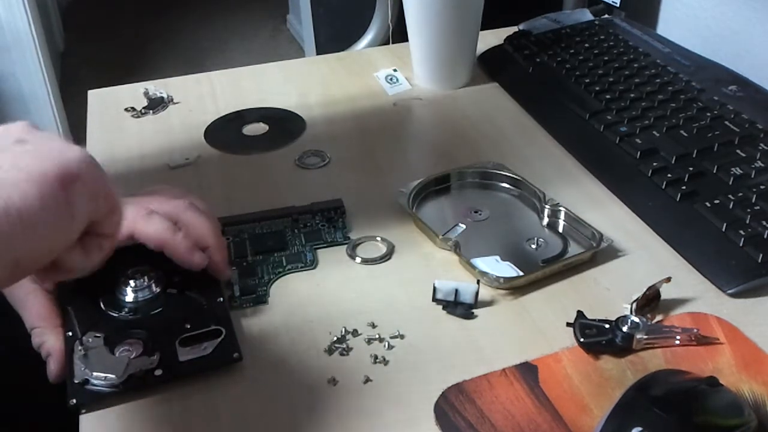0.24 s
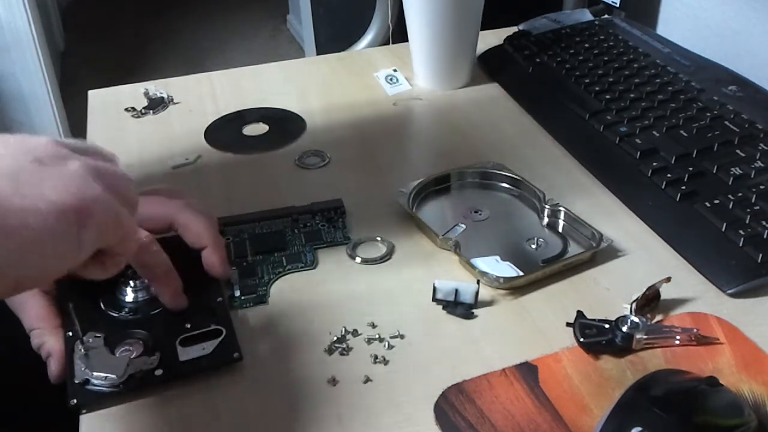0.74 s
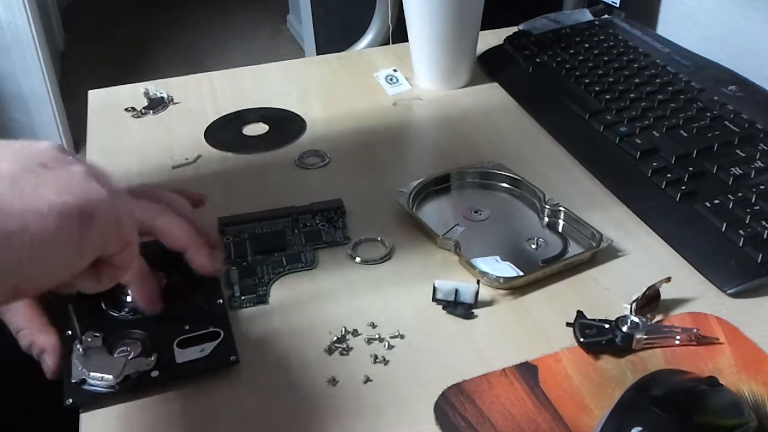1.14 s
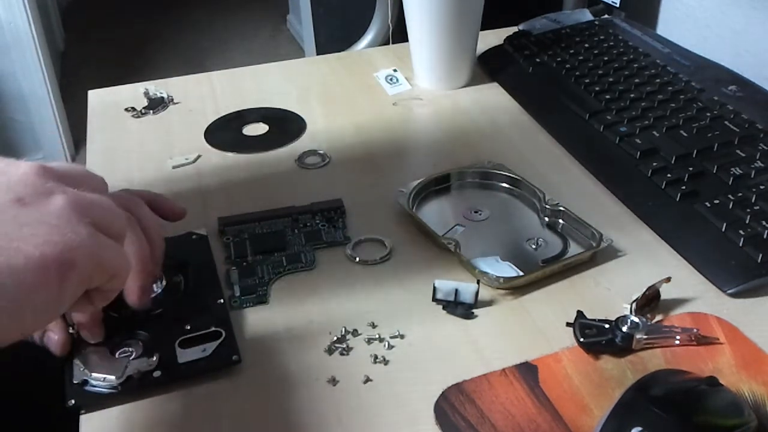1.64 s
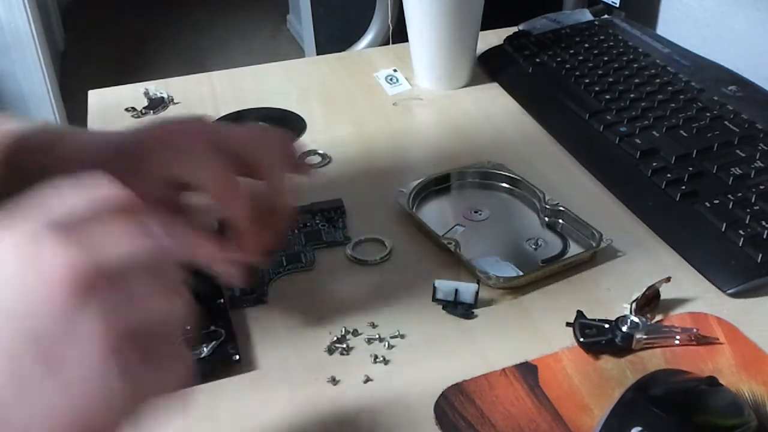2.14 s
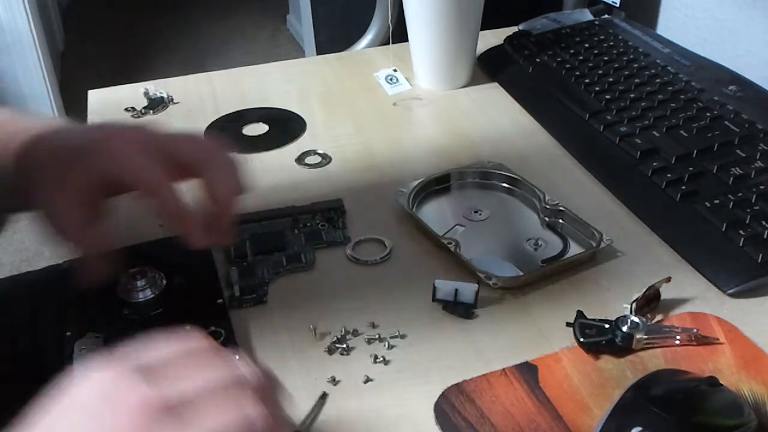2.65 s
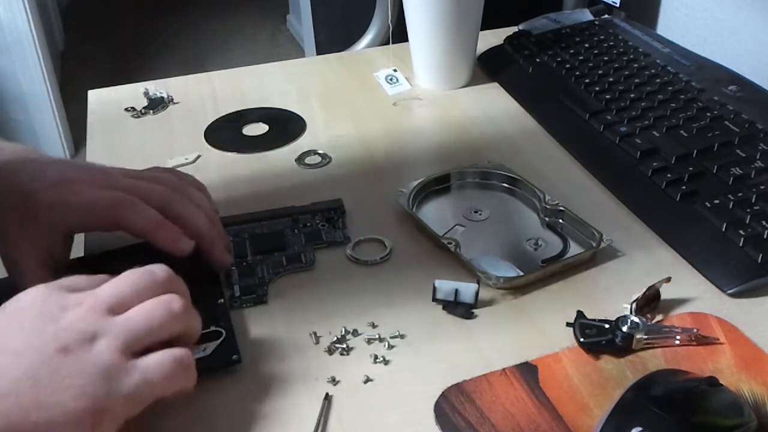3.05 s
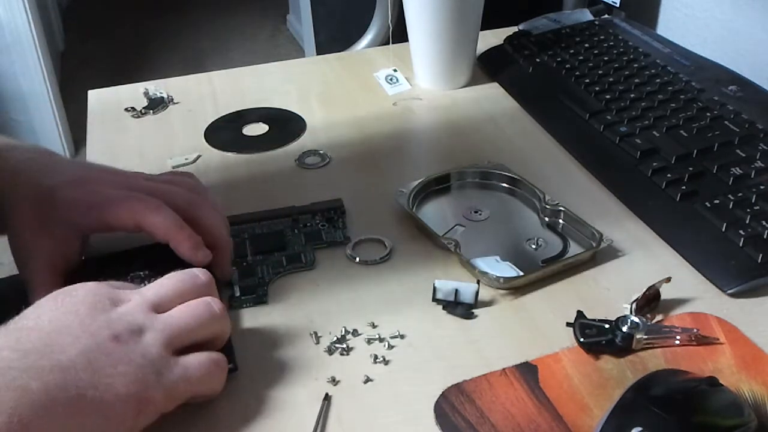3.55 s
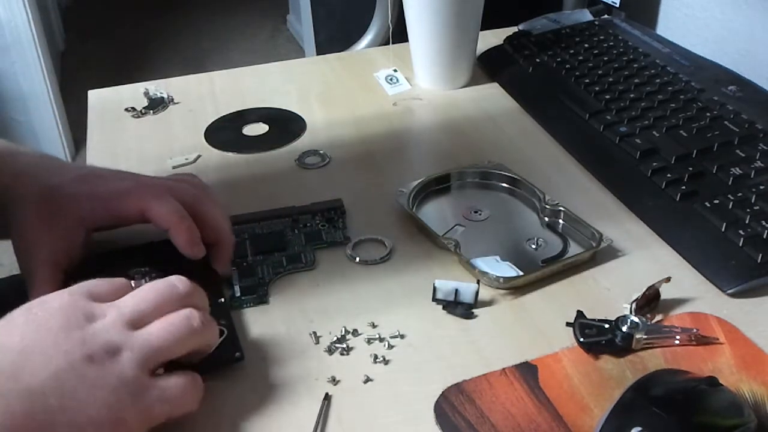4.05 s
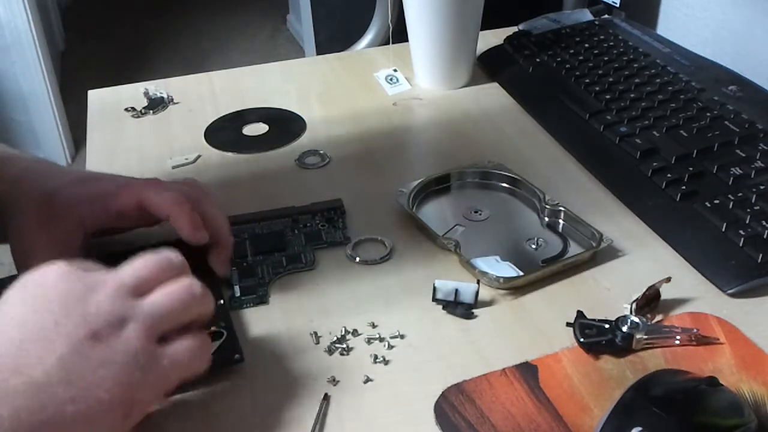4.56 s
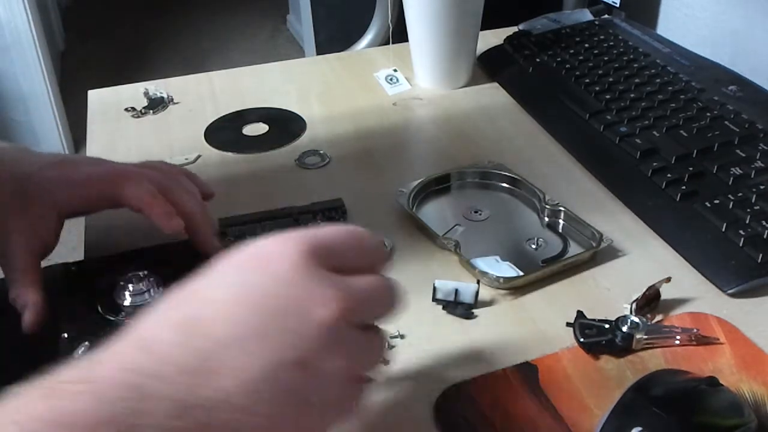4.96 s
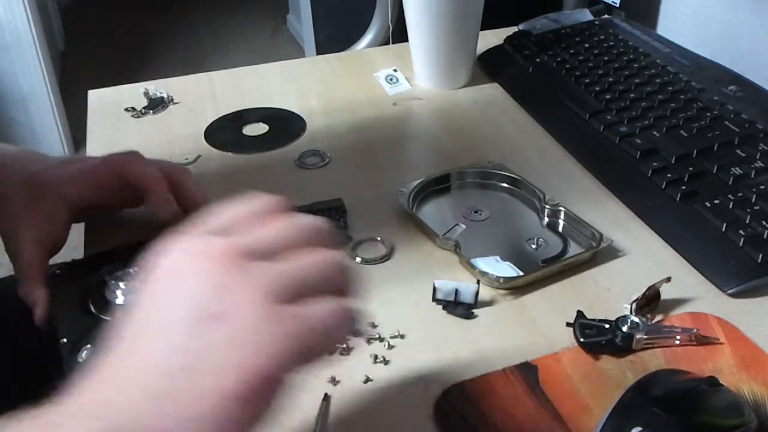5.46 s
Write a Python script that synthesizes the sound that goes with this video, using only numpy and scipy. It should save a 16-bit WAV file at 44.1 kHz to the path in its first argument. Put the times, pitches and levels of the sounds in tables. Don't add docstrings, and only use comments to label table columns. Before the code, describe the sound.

Hands dismantle a hard drive on a wooden desk in a small room, with a low fan hum and light hiss beneath. From 0 to 2.2 s a screwdriver rubs in a screw: short, swelling, gritty metallic scrapes, the strongest near 0.9 s, with tiny slip clicks from 1.1 s. At 2.46 s a hard tick, then a sharp crack at 2.54 s as a screw falls; until 2.9 s it skips while the tool bounces. Soft thuds follow at 3.1 and 3.4 s. From 3.7 to 3.9 s the metal frame crashes, bright, ringing and clipped. Ticks and rattles come around 4.2, 4.3 and 4.5 s, densest at 4.7 s. A small part is set down at 4.84 s, rocking briefly, then slides with a faint high squeak from 4.93 to 5.58 s. A hollow knock at 5.56 s and light clicks finish. Close, bright microphone; short room echo.

```python
import sys
import numpy as np
from scipy import signal
from scipy.fft import rfft, irfft
from scipy.io import wavfile

SR = 44100
rng = np.random.default_rng(int(sys.argv[2]) if len(sys.argv) > 2 else 0)


def file_out(sig):
    cols = np.atleast_2d(sig).T
    lim = np.clip(cols, -1, 1)
    pcm = np.round(lim * 32767).astype(np.int16)
    wavfile.write(sys.argv[1], SR, pcm)


def undo_db(level):
    steps = np.asarray(level, float) / 20
    return 10 ** steps


N = 252252


def rms_one(x):
    return x / np.sqrt(np.mean(x ** 2) + 1e-20)


def in_time(rows, outside=-120):
    s, *columns = np.transpose(rows)
    return [np.interp(np.arange(N) / SR, s, c, left=outside, right=outside) for c in columns]


def at_hz(points, hz, column=1):
    points = np.array(points)
    return np.interp(np.log(hz), np.log(points[:, 0]), points[:, column])


def high_pass(x, hz):
    return signal.sosfilt(signal.butter(4, hz, "high", fs=SR, output="sos"), x)


def add(out, s, piece):
    at = round(s * SR)
    out[at:at + len(piece)] += piece[:N - at]


def ring(drive, hz, t60_s):
    r = undo_db(-60 / (max(t60_s, 0.003) * SR))
    w = 2 * np.pi * hz / SR
    return signal.lfilter([0, np.sin(w)], [1, -2 * r * np.cos(w), r * r], drive + 1e-18)


def resonances(drive, peaks):
    out = 0
    for hz, width_hz, db in peaks:
        t60_s = np.log(1000) / np.pi / width_hz
        out = out + undo_db(db) * rms_one(ring(drive, hz, t60_s))
    return out


def grit(per_s, spread_db):
    sizes = undo_db(spread_db * np.minimum(rng.exponential(1, N), 4)) * rng.choice([-1, 1], N)
    return sizes * (rng.random(N) < per_s / SR)


def contact(length_ms, draw, first_db):
    t = np.arange(len(draw)) / SR
    burst = draw * np.abs(draw) * np.exp(-1000 * t / max(length_ms, 0.1))
    burst[0] = 4 * undo_db(first_db)
    return burst / np.sqrt(np.sum(burst ** 2))


def strike(touch, hz, t60_s):
    turning = np.exp(-2j * np.pi * hz * np.arange(1500) / SR)
    uptake = np.abs(np.sum(touch[:1500] * turning))
    return ring(touch, hz, t60_s) / np.sqrt(0.1 + 0.9 * uptake ** 2)


def swell(count, hz, t60_s, rise_ms, phase):
    t = np.arange(count) / SR
    rise = 1 - np.exp(-1000 * t / max(rise_ms, 0.1))
    return np.sin(2 * np.pi * hz * t + phase) * undo_db(-60 * t / t60_s) * rise


def cracks(rows):
    out = np.zeros(N)
    for s, db, hz, octaves, chatter_ms, first_db in rows:
        half = 2 ** (np.clip(octaves, 0.2, 3) / 2)
        edges_hz = [hz / half, min(hz * half, 0.45 * SR)]
        band = signal.butter(1, edges_hz, "band", fs=SR, output="sos")
        crack = signal.sosfilt(band, contact(chatter_ms, rng.standard_normal(4000), first_db))
        add(out, s, undo_db(db) * crack / np.abs(crack).max())
    return high_pass(out, 600)


def lone_rings(rows):
    out = np.zeros(N)
    for s, db, hz, t60_s in rows:
        rise_ms = min(1700 / hz, 5)
        add(out, s, undo_db(db) * swell(SR // 4, hz, max(t60_s, 0.01), rise_ms, 0))
    return out


# frequency in Hz, density in dB per Hz.
HISS = [(30, -60), (45, -40), (58, -20), (85, -39.5), (125, 0.5), (165, -17.5), (210, -2), (300, -3),
        (500, -2.5), (800, -7.5), (1200, -9.5), (2000, -12.5), (3000, -15.5), (4500, -19), (8500, -19.5)]
# frequency in Hz, width in Hz, rms in dB.
FAN_BANDS = [(202.5, 6.2, -61), (264, 5.2, -69.5), (477, 20, -64.5), (527, 3.8, -68), (615, 4.2, -67.5),
             (817, 10, -63), (1077, 33, -63.5)]


def room_noise():
    hz = np.maximum(np.fft.rfftfreq(N, 1 / SR), 1)
    hiss = rms_one(irfft(rfft(rng.standard_normal(N)) * undo_db(at_hz(HISS, hz)), N))
    return undo_db(-51.5) * hiss + resonances(rng.standard_normal(N), FAN_BANDS)


# greatest pressure in seconds, rub in dB, rise in s, fall in s.
TURNS_OF_TOOL = [
    (.17, -45.5, 0.066, 0.054),
    (.51, -50, 0.092, 0.11),
    (0.862, -44, 0.097, 0.037),
    (1.1, -49.5, .045, 0.12),
    (1.41, -64, 0.2, .1),
    (1.528, -50, 0.029, .03),
    (1.6, -60, .03, .05),
    (1.96, -56.5, 0.062, 0.18),
    (2.13, -53.5, 0.043, 0.08),
]


def pressure():
    t = np.arange(N) / SR
    turns, swing_db, grip_end_s = 0, 26.5, 1.9
    for s, db, rise_s, fall_s in TURNS_OF_TOOL:
        away = np.maximum((s - t) / rise_s, (t - s) / fall_s)
        turns = turns + undo_db(db - swing_db * away)
    return turns, t < grip_end_s


# frequency in Hz, width in Hz, level in dB.
RUB_RESONANCES = [(1110, 17, 1.5), (1303, 36, -1), (1832, 126, 2), (2880, 122, 1.5), (3827, 95, -1),
                  (4460, 260, 2.5), (5000, 330, -1.5), (5980, 380, -5.5), (7370, 1200, -3.5)]


def rubbing():
    split_hz, low_share_db, grip_db, grip_low_db = 3300, -2.5, -98, -75
    turns, held = pressure()
    drive = grit(4900, spread_db=6.5)
    upper = resonances(drive, [p for p in RUB_RESONANCES if p[0] > split_hz])
    upper = upper + 0.86 * rms_one(np.diff(drive, prepend=0))
    lower = resonances(drive, [p for p in RUB_RESONANCES if p[0] < split_hz])
    upper_gain = turns + held * undo_db(grip_db)
    lower_gain = undo_db(low_share_db) * turns + held * undo_db(grip_low_db)
    return upper_gain * rms_one(upper) + lower_gain * rms_one(lower)


# start in seconds, peak in dB, boom in dB, knock in dB.
HAND_LANDINGS = [(0.236, -38.5, -14, -18), (.927, -44, -20.5, -19), (1.517, -29.5, -19, -39.5),
                 (1.6, -54, -15, -11), (2.541, -45, -19.5, 19.5), (3.087, -29, -23, -14),
                 (3.096, -26, -13, -10), (3.127, -38.5, -16, 0), (3.405, -12, -24, -32),
                 (3.413, -24, -18, -17), (3.7027, -17, -20, 4), (3.768, -21, -17, -8),
                 (3.818, -19, -9, -23.5), (3.835, -16, -20, 0.5), (3.926, -30, -17, -17.5),
                 (4.161, -32, -6, -1.5), (4.192, -28.5, -12, 1), (4.607, -25, -21, -6),
                 (4.764, -26, -22, 1), (5.358, -41, -22, -3), (5.422, -38.5, -27, 0),
                 (5.559, -20, -16, -3.5), (5.565, -21, -23, -33), (5.657, -36.5, -9.5, 14.5)]
# start in seconds, peak in dB, knock in dB, length in ms.
HARD_KNOCKS = [(2.1, -55, 10, 15), (2.46, -27, 0.5, 12), (2.6691, -21, 7.5, 3), (2.733, -27, 6, 10.4),
               (2.771, -29, 10.5, 6.1), (2.801, -27.5, 3.5, 39), (4.316, -29, 4.5, 11.5),
               (4.345, -36.5, 6.5, 8.2), (4.834, -19.5, -4.5, 7.6), (4.845, -32.5, 4, 5.7),
               (4.857, -27, 2, 8), (4.875, -27.5, -3, 3.8)]
# start in seconds, peak in dB.
ARM_LEANS = [
    (3.2, -72),
    (3.562, -57),
    (4.132, -48.5),
    (5.056, -55),
    (5.097, -56.5),
    (5.129, -57),
]


def blows():
    landings = [row + (10.5,) for row in HAND_LANDINGS]
    leans = [row + (6.6, -1.5, 14) for row in ARM_LEANS]
    knocks = [(s, db, -30.5, knock_db, ms) for s, db, knock_db, ms in HARD_KNOCKS]
    return sorted(landings + leans + knocks)


# frequency in Hz, level in dB, t60 in s.
DESK_MODES = [(255, -10, 0.0043), (318, -27, 0.01), (376, 11, 0.021), (455.4, 7.5, 0.028),
              (505, 0.5, 0.065), (660, 0.5, 0.024), (724, -9.5, 0.026), (867, -25.5, 0.025), (940, 8, 0.02),
              (1240, -14, 0.046), (1300, -4, 0.019), (1511, 15, 0.0046), (1724, -11, 0.12),
              (1870, -1.5, 0.016), (2340, -14.5, 0.0099), (2797, 6, 0.011), (3170, -24, 0.0056)]
# frequency in Hz, level in dB, t60 in s.
LEG_MODES = [(55, -3, 0.094), (114, -31, 0.18), (153.3, 16.5, 0.14), (175, -6, 0.045)]


def thuds():
    plate, push, rows = np.zeros(N), np.zeros(N), blows()
    draws = rng.standard_normal((len(rows), 8000))
    shares_db = rng.normal(0, 2, (len(rows), len(DESK_MODES)))
    for (s, db, boom_db, knock_db, length_ms), draw, blow_shares_db in zip(rows, draws, shares_db):
        touch = contact(length_ms, draw, first_db=4)
        bass_db = -0.28 * np.clip(knock_db + 0.5, 0, 14)
        groups = [(390, bass_db), (455, 0.015), (650, 0.015), (850, knock_db - 0.5)]
        piece = 0
        for (hz, mode_db, t60_s), share_db in zip(DESK_MODES, blow_shares_db):
            level_db = mode_db + share_db + at_hz(groups, hz)
            piece = piece + undo_db(level_db) * strike(touch, hz, t60_s)
        cut_hz = 149 + 11.1 * np.clip(knock_db + 10.5, 0, 14)
        add(plate, s, undo_db(db - 13.5) * high_pass(piece, cut_hz))
        add(push, s, undo_db(db + boom_db - 12.5) * np.hanning(260) / 130)
    boom = sum(undo_db(db) * ring(push, hz, t60_s) for hz, db, t60_s in LEG_MODES)
    return high_pass(plate, 185) + high_pass(boom, 58)


# start in seconds, peak in dB.
TOOL_SLIPS = [
    (1.141, -36.5),
    (1.1504, -53),
    (1.384, -42),
    (1.4087, -36.5),
    (1.428, -42),
    (1.5254, -55.5),
    (1.5946, -39),
    (1.955, -40),
    (2.114, -34),
]
# centre in Hz, width in octaves, chatter in ms, first touch in dB.
SLIP_TOUCH = (4450, 1.3, 6.5, -5)


def slips():
    return [row + SLIP_TOUCH for row in TOOL_SLIPS]


# start in seconds, peak in dB.
FRAME_BRUSHES = [
    (1.385, -61),
    (1.5263, -53),
    (1.6, -65),
]
# low, middle and high in dB.
BRUSH_MODES = (-27, -12, 11)
# start in seconds, peak, low, middle and high modes in dB.
FRAME_CRASH = [(3.7032, -13, -6, 7, 9.5), (3.713, -7.5, -14.5, -13.5, 9.5),
               (3.7295, -26.5, -24, -13.5, 26.5), (3.742, -41, -6, -6, 10), (3.775, -8, -25, -22, -11),
               (3.817, 0, -15, -12, -24), (3.826, -3, -39, -17, -28), (3.841, 0.5, -24, -30, -31),
               (3.8564, -20, -41, 15, 13), (3.885, -47, -9, -6, -19), (3.97, -24, -23, -9.5, -7)]
# start in seconds, peak, low, middle and high modes in dB.
FRAME_RATTLES = [(4.1067, -34, -5.5, 1, -6.5), (4.1604, -39, -5.5, 2, -0.5), (4.1919, -20, -9.5, 5, 2.5),
                 (4.489, -34, -4.5, 0, -19), (4.4936, -30.5, -33.5, -29, -7.5), (4.539, -29, -10, -27, -16),
                 (4.665, -32.5, -42, -16, -6), (4.677, -17, -11, -18, -8), (4.6846, -15, -14, -5, -16),
                 (4.6935, -20, -4.5, 5, -8), (4.706, -26, -20, 11.5, 7.5), (4.7119, -23.5, -23, -5, -19),
                 (4.721, -31, 8, -15, -17.5), (4.7384, -44, 15, -7, -9), (4.8354, -26, -5, -16, -35.5),
                 (4.856, -29, -11, -16, -1.5)]


def strikes():
    brushes = [row + BRUSH_MODES + (1.5,) for row in FRAME_BRUSHES]
    crash = [row + (4.6,) for row in FRAME_CRASH]
    rattles = [row + (1.5,) for row in FRAME_RATTLES]
    return brushes + crash + rattles


# frequency in Hz, level in dB, t60 in s.
FRAME_MODES = [(1093, -7, .1), (1378, -6, .22), (1644, 0, .22), (1755, -4, .08), (2100, -12, .03),
               (2520, -12, .05), (2597, 0, .13), (2700, -7, .06), (2767, -1, .09), (2850, -10, .05),
               (3080, -12, .05), (3300, -10, .03), (3720, -5, .07), (3795, 0, .09), (4121, -7, .07),
               (4285, -9, .05), (4450, -10, .04), (4708, -6, .06), (4806, -3, .07), (4889, -1, .065),
               (5050, -8, .05), (5170, -5, .06), (5750, -9, .04), (6070, -10, .04), (6400, -14, .02),
               (6750, -13, .03), (7300, -16, .02), (7820, -15, .03), (8100, -15, .03)]


def clanks():
    out, rows = np.zeros(N), strikes()
    ring_db, skirt_db, held_from_s = 2, -7, 3.6
    draws = rng.standard_normal((len(rows), 12000))
    grips = rng.standard_normal((len(rows), len(FRAME_MODES), 2))
    for (s, db, low_db, mid_db, high_db, chatter_ms), draw, grip in zip(rows, draws, grips):
        touch = contact(chatter_ms, draw, first_db=6)
        groups = [(1900, low_db), (2150, low_db),
                  (2530, skirt_db), (2580, ring_db), (2790, ring_db), (2840, skirt_db), (3320, skirt_db),
                  (3600, mid_db), (4000, mid_db),
                  (4100, high_db - 6.5), (5300, high_db - 1), (5700, high_db + 3)]
        damping = 0.56 if s > held_from_s else 0.95
        modes = 0
        for (hz, mode_db, t60_s), (share_db, shift) in zip(FRAME_MODES, grip):
            mode = swell(len(touch), hz * (1 + 0.0032 * shift), damping * t60_s,
                         0.061 * chatter_ms, 2 * np.pi * share_db)
            modes = modes + undo_db(mode_db + share_db + at_hz(groups, hz)) * mode
        click = undo_db(high_db - 11) * np.diff(touch, prepend=0)
        add(out, s, undo_db(db - 7) * (modes + click))
    return high_pass(out, 920)


# start in seconds, peak in dB, centre in Hz, width in octaves.
HARD_TICKS = [(2.4602, -17, 3240, 0.62), (2.4714, -34, 2940, 0.53), (2.6685, -28, 4600, 1.1),
              (3.0894, -34.5, 4190, 0.59), (3.13, -25.5, 4460, .58), (3.227, -48, 4570, .96),
              (3.8137, -7, 4800, 1.2), (4.191, -16, 4400, 0.37), (4.3137, -12.5, 4500, 1.1),
              (4.3395, -14.5, 4460, 1), (4.6065, -38, 3800, 1.1), (4.7104, -12, 3870, 1),
              (4.8373, -36, 3800, 0.76), (4.854, -34, 4130, 0.84), (5.5617, -34, 4300, 0.83),
              (5.6442, -30, 3480, .8), (5.6794, -22, 4350, 1.05)]
# chatter in ms, first touch in dB.
TICK_TOUCH = (4.6, 1)


def hard_ticks():
    return [row + TICK_TOUCH for row in HARD_TICKS]


# start in seconds, peak in dB, frequency in Hz, t60 in s.
LONE_DESK_MODES = [(2.4605, -30, 1700, 0.07), (2.4605, -26, 2076, .05), (2.4605, -31, 480, 0.066),
                   (2.822, -31, 400, .05), (3.4076, -21, 380, .07), (4.8355, -28, 500, 0.045),
                   (4.866, -23, 506, 0.042), (5.56, -17.5, 362, 0.07), (5.5605, -20, 506, .07),
                   (5.568, -21, 400, .05), (5.65, -33, 1500, .04), (3.091, -31.5, 259, 0.075),
                   (4.765, -24, 504, .06), (5.055, -41, 100, 0.25), (5.095, -46, 118, 0.18),
                   (5.56, -17, 769, 0.048), (5.561, -24, 970, 0.041), (5.559, -25.5, 1330, 0.039),
                   (5.56, -24, 1570, .04)]


def desk_rings():
    return lone_rings(LONE_DESK_MODES)


# start in seconds, peak in dB, centre in Hz, width in octaves.
SCREW_FALLS = [
    (2.5418, -3, 5600, 2.04),
    (2.6465, -5, 6100, 1.1),
]
# chatter in ms, first touch in dB.
FALL_TOUCH = (3.14, 5)


def screw_drops():
    return [row + FALL_TOUCH for row in SCREW_FALLS]


# start in seconds, peak in dB, centre in Hz, width in octaves, chatter in ms.
LOOSE_CHATTER = [(2.543, -18, 7000, .6, 8), (2.6688, -13, 1700, 1.2, 8), (2.684, -22, 1600, 1.2, 10),
                 (2.7715, -21, 1300, 1, 6), (2.7157, -18, 7000, .7, 3), (2.733, -24, 900, 1.3, 12),
                 (2.7892, -21, 7000, .7, 3), (3.694, -34, 4000, 1.5, 12), (3.817, -8, 5500, 1.3, 12),
                 (3.835, -8, 4800, 1.4, 6), (4.194, -26, 2100, .8, 30), (4.342, -28, 2200, .8, 10),
                 (3.856, -9, 4200, 1, 8), (4.198, -25, 4500, 1.3, 25), (4.248, -30, 3200, 1.3, 15),
                 (4.3136, -14, 5000, 1.5, 1.5), (4.324, -26, 5500, 1, 2), (4.687, -26, 6300, .7, 15),
                 (4.72, -27, 6500, .7, 20), (4.845, -31, 4500, .6, 15), (5.5595, -24, 1500, 1, 6),
                 (5.59, -38, 4500, .8, 30)]


def chatter():
    return [row + (-3,) for row in LOOSE_CHATTER]


# start in seconds, peak in dB, frequency in Hz, t60 in s.
LONE_PART_MODES = [(2.543, -8.5, 4210, 0.011), (2.657, -26, 7540, .03), (3.704, -14.5, 1083, .06),
                   (3.704, -11.5, 4900, 0.06), (3.71, -4.5, 5160, .03), (3.728, -7.5, 4770, 0.035),
                   (3.705, -1.5, 2643, 0.0416), (3.761, -16, 5180, .03), (3.74, -5.5, 4850, 0.037),
                   (3.7746, -9, 2597, .06), (3.7745, -9.5, 2750, .05), (3.8175, -6.5, 2750, .05),
                   (3.829, -4, 2590, 0.084), (3.858, -19.5, 1642, .15), (3.777, -24, 1086, 0.32),
                   (3.814, -11, 5900, 0.02), (3.8262, -22, 4120, .04), (3.834, 0.5, 2613, 0.12),
                   (3.848, -1.5, 2581, 0.064), (3.8262, -7.5, 2706, 0.066), (3.836, -10.5, 4144, 0.059),
                   (3.858, -23, 3670, 0.11),
                   (4.193, -15, 3760, 0.05), (4.1915, -15.5, 2600, 0.092), (4.1917, -17, 2765, .07),
                   (4.2, -28, 5000, 0.11), (4.192, -26, 5755, 0.066), (4.193, -22, 3900, .02),
                   (4.19, -27.5, 1097, 0.037), (4.236, -29, 5840, .02), (4.252, -30, 2100, .04),
                   (4.3138, -21, 7960, 0.027), (4.3138, -18, 3850, .03), (4.3405, -19.5, 4400, .03),
                   (4.3138, -27, 6080, 0.0317), (4.341, -27, 6330, .02), (4.487, -46, 4220, 0.0333),
                   (4.494, -41, 5300, 0.071), (4.537, -28.5, 6160, 0.0306), (4.542, -24.5, 5749, 0.032),
                   (4.538, -32, 4970, 0.066), (4.538, -33, 1660, 0.13), (4.537, -32.5, 3100, 0.04),
                   (4.661, -44, 5240, 0.04), (4.71, -29, 1380, .25), (4.738, -27, 3790, .15),
                   (4.692, -18, 2700, .03), (4.669, -29, 5100, .04), (4.676, -22, 4904, 0.074),
                   (4.709, -17, 4859, .04), (4.713, -11.5, 2707, 0.048), (4.708, -15, 3770, 0.058),
                   (4.685, -25, 5750, 0.059), (4.688, -24.5, 6153, .04), (4.707, -23.5, 8000, 0.035),
                   (4.717, -24, 5740, 0.036), (5.56, -35, 3768, 0.047), (5.651, -23.5, 4350, 0.027),
                   (5.653, -26, 2980, 0.056), (5.68, -36, 4350, .04)]


def part_rings():
    return lone_rings(LONE_PART_MODES)


# start in seconds, peak in dB, upper modes in dB.
SCREWDRIVER_BOUNCES = [
    (2.6641, -34, 0),
    (2.6687, -14, 1),
    (2.682, -24, 0),
    (2.69, -25, -3),
    (2.7324, -22, -4),
    (2.7405, -26, -10),
    (2.7715, -21.5, -0.5),
    (2.781, -29.5, 0),
]
# frequency in Hz, level in dB, t60 in s.
SCREWDRIVER_MODES = [(350, -11, 0.058), (485, -1, 0.081), (853, -4, .05), (963, -0.5, .05),
                     (1205, -9.5, 0.042), (1338, 0.5, .05), (1500, -1.5, 0.042), (1900, -7.5, 0.044),
                     (2120, -10, .03), (2270, -11, .04), (2830, -10, 0.016), (3330, -12, 0.033)]


def tool_bounces():
    out = np.zeros(N)
    for s, db, upper_db in SCREWDRIVER_BOUNCES:
        for hz, mode_db, t60_s in SCREWDRIVER_MODES:
            level_db = db + mode_db + upper_db * (hz > 1100)
            add(out, s, undo_db(level_db) * swell(SR // 6, hz, max(t60_s, 0.01), 0.35, 0))
    return out


# start in seconds, peak in dB.
SCREW_SKIPS = [
    (2.7156, -13),
    (2.731, -26),
    (2.7591, -22),
    (2.7894, -12.5),
    (2.826, -21),
    (2.851, -21.5),
    (2.8711, -24),
    (2.8911, -31),
]
# centre in Hz, width in octaves, chatter in ms, first touch in dB.
SKIP_TOUCH = (4400, 1.3, 4.2, 6.2)


def screw_skips():
    return [row + SKIP_TOUCH for row in SCREW_SKIPS]


# frequency in Hz, level in dB, t60 in s.
SHANK = (4200, -11.5, 0.015)


def screw_shank():
    hz, shank_db, t60_s = SHANK
    return lone_rings([(s, db + shank_db, hz, t60_s) for s, db in SCREW_SKIPS])


# start in seconds, peak in dB, centre in Hz, width in octaves.
GLANCING_SCUFFS = [
    (3.406, -32, 3800, 0.58),
    (4.101, -40.5, 5100, 1),
    (4.229, -30, 4900, .7),
    (4.4869, -26, 4600, 1.32),
    (4.537, -20, 6500, 1.7),
    (4.675, -16.5, 4960, 1.3),
    (5.6517, -19, 4240, 0.37),
]
# chatter in ms, first touch in dB.
SCUFF_TOUCH = (10.9, -13.5)


def scuffs():
    return [row + SCUFF_TOUCH for row in GLANCING_SCUFFS]


# start in seconds, peak in dB, centre in Hz, width in octaves.
FRAME_GRINDS = [
    (3.7027, 3, 3900, 1.5),
    (3.8269, 4.5, 4200, 3.1),
]
# chatter in ms, first touch in dB.
GRIND_TOUCH = (18.2, 2.3)


def grinds():
    return [row + GRIND_TOUCH for row in FRAME_GRINDS]


# start in seconds, peak in dB.
PART_ROCKS = [
    (4.8353, -19),
    (4.844, -24.5),
    (4.855, -26),
    (4.861, -21.5),
    (4.87, -27),
    (4.876, -26),
    (4.898, -38),
]
# frequency in Hz, level in dB, t60 in s.
PART_MODES = [(1154, -7.5, 0.079), (1387, -10.5, 0.047), (1756, 0, 0.056), (2615, -7, .05),
              (1920, -17, 0.05), (3410, -9, 0.017), (780, -8, .04), (506, -6, .05)]


def set_down():
    s, db = np.transpose(PART_ROCKS)
    clicks = np.zeros(N)
    clicks[np.round(s * SR).astype(int)] = undo_db(db)
    return sum(undo_db(mode_db) * ring(clicks, hz, t60_s) for hz, mode_db, t60_s in PART_MODES)


# time in seconds, speed as level in dB.
SLIDE_SPEED = [
    (4.93, -62),
    (4.99, -55),
    (5.01, -48.5),
    (5.07, -47),
    (5.154, -48),
    (5.336, -53),
    (5.476, -52.5),
    (5.542, -45),
    (5.58, -45),
]
# frequency in Hz, width in Hz, level in dB.
SLIDE_RESONANCES = [(4210, 94, -8), (4350, 260, -0.5), (4850, 500, -3), (5500, 400, -1), (3140, 1100, -4)]
# time in seconds, frequency in Hz.
SQUEAK_PITCH = [
    (4.93, 5500),
    (5.1, 5600),
    (5.3, 5700),
    (5.45, 5430),
    (5.5, 5395),
    (5.58, 5370),
]
CATCHES_S = (5.517, 5.542)


def slide():
    t = np.arange(N) / SR
    slide_db, = in_time(SLIDE_SPEED)
    hz, = in_time(SQUEAK_PITCH, outside=5100)
    catch = sum(np.exp(-((t - s) / 0.012) ** 2) for s in CATCHES_S)
    squeak_db = slide_db - 12 + 19 * catch
    wobble = rms_one(ring(rng.standard_normal(N), 25, 0.05))
    squeak = (0.8 + 0.8 * wobble) * np.sin(2 * np.pi * np.cumsum(hz) / SR)
    scrape = rms_one(resonances(grit(9900, spread_db=0.5), SLIDE_RESONANCES))
    return undo_db(slide_db - 3) * scrape + undo_db(squeak_db) * squeak


# frequency in Hz, t60 in s, level in dB.
ROOM_DECAY = [(152, 0.18, 1.5), (497, 0.26, -6.5), (1200, 0.23, -0.5), (2600, 0.22, -0.5), (3610, 0.3, 0),
              (4800, 0.29, -2.5), (6150, 0.23, -3.5), (8900, 0.3, -7)]


def room():
    t = np.arange(SR // 2) / SR
    tail = 0
    edges_hz = 60 * 2 ** np.arange(0, 7.6, 0.5)
    for low, high in zip(edges_hz, edges_hz[1:]):
        half_octave = signal.butter(2, [low, high], "band", fs=SR, output="sos")
        band = signal.sosfilt(half_octave, rng.standard_normal(len(t)))
        hz = np.sqrt(low * high)
        t60_s = max(at_hz(ROOM_DECAY, hz), 0.05)
        level_db = at_hz(ROOM_DECAY, hz, column=2) - 60 * t / t60_s
        tail = tail + band * undo_db(level_db) / np.sqrt(t60_s * SR / 14)
    return tail * np.clip(t / 0.0045, 0, 1)


def microphone(x):
    peak_hz, width_hz, peak_db, cut_hz = 4650, 690, 5, 9616
    r, w = np.exp(-np.pi * width_hz / SR), 2 * np.pi * peak_hz / SR
    port = signal.lfilter([(1 - r * r) / 2, 0, (r * r - 1) / 2], [1, -2 * r * np.cos(w), r * r], x)
    edge = signal.cheby2(10, 60, cut_hz, fs=SR, output="sos")
    return signal.sosfilt(edge, 0.8 * x + undo_db(peak_db) * 0.5 * port)


def scene():
    touches = sorted(hard_ticks() + screw_drops() + screw_skips() + scuffs() + grinds())
    hands = rubbing() + slide() + cracks(touches + slips()) + thuds() + clanks()
    lone = desk_rings() + part_rings() + screw_shank()
    lone = lone + high_pass(tool_bounces() + undo_db(2.5) * set_down(), 260)
    walls, noise = room(), room_noise()
    hands = hands + cracks(chatter())
    echoes = signal.fftconvolve(hands + undo_db(-8) * lone, walls)[:N]
    return microphone(hands + lone + echoes + noise)[None]


def low_pass(x):
    return signal.sosfilt(signal.butter(12, 16650, fs=SR, output="sos"), x)


def record(dry):
    clip, droop_db = 0.7, -6
    clipped = np.clip(dry, -clip, clip)
    spill = signal.sosfiltfilt(signal.butter(4, 9500, "high", fs=SR, output="sos"), clipped)
    band = signal.cheby2(8, 40, 16400, fs=SR, output="sos")
    mix = signal.sosfiltfilt(band, clipped + (undo_db(droop_db) - 1) * spill)
    return low_pass(mix)


dry = scene()
out = record(dry)
file_out(out)
```